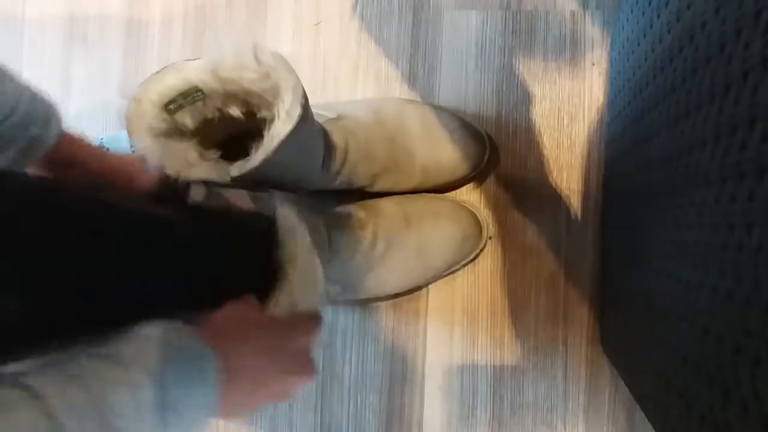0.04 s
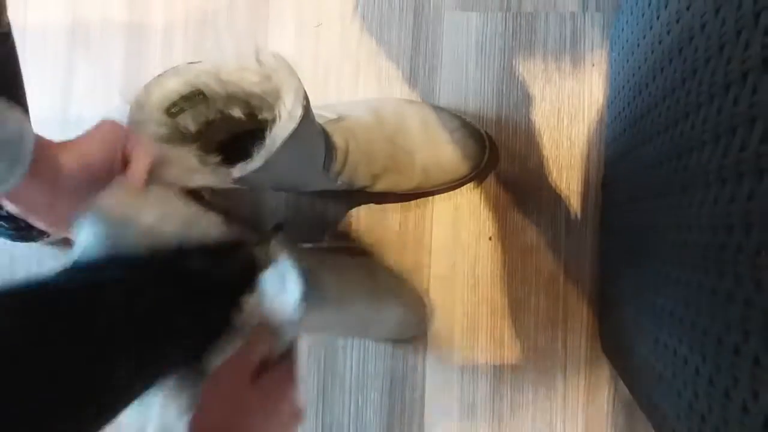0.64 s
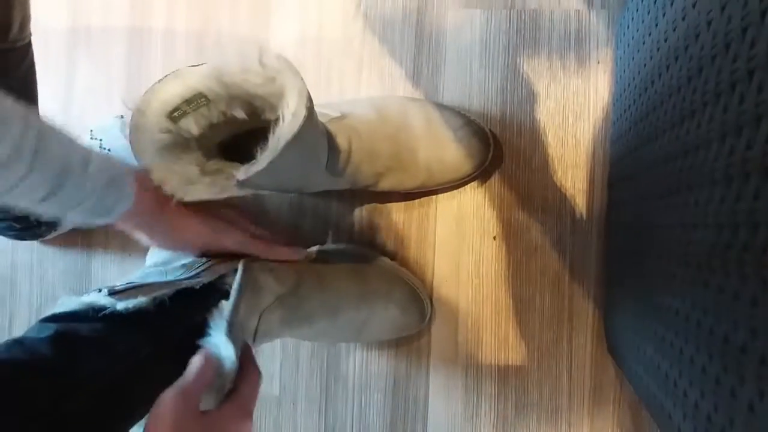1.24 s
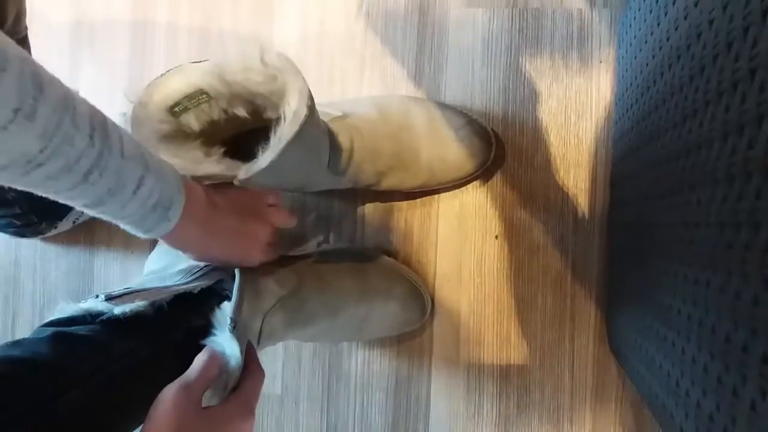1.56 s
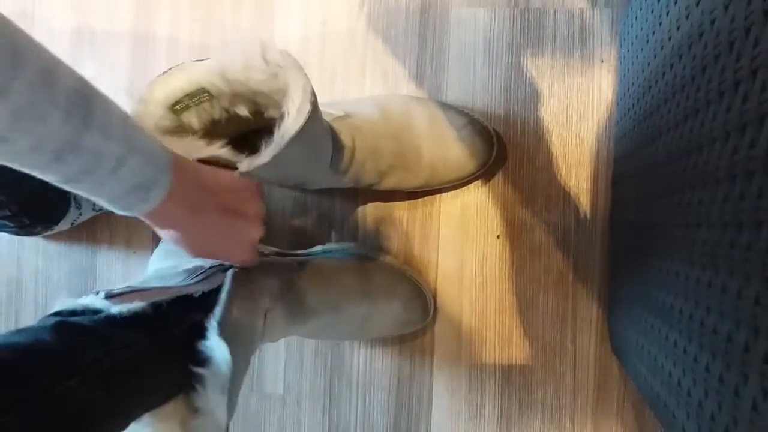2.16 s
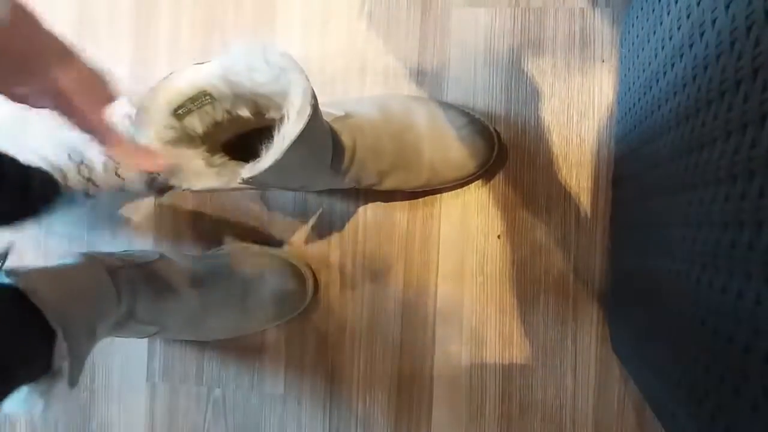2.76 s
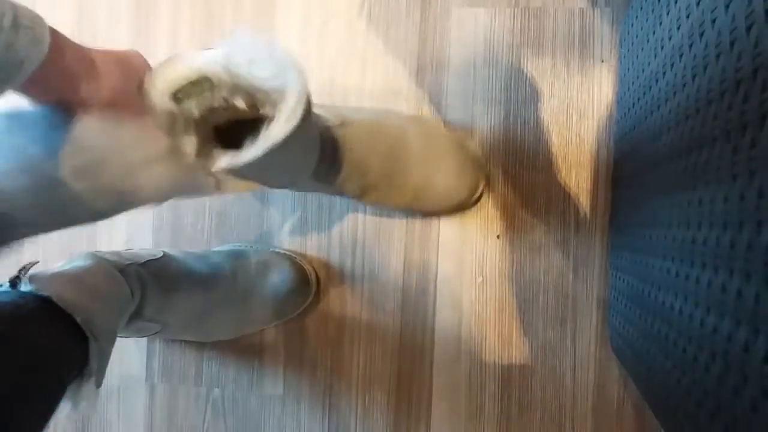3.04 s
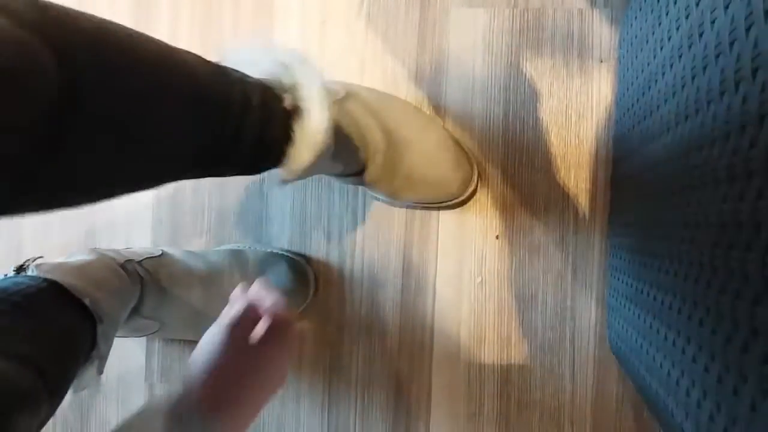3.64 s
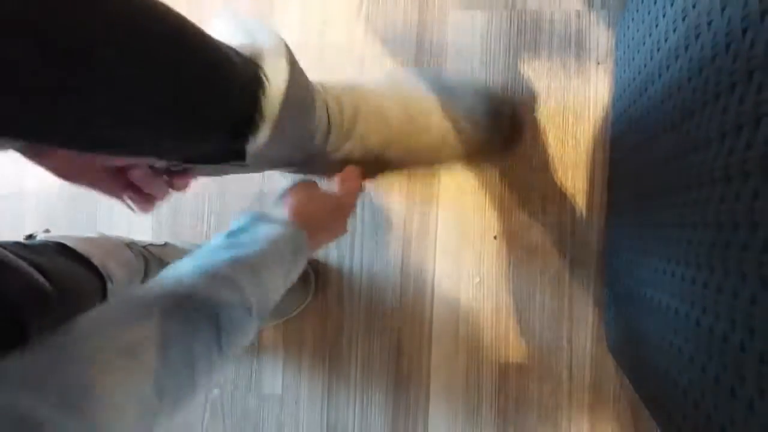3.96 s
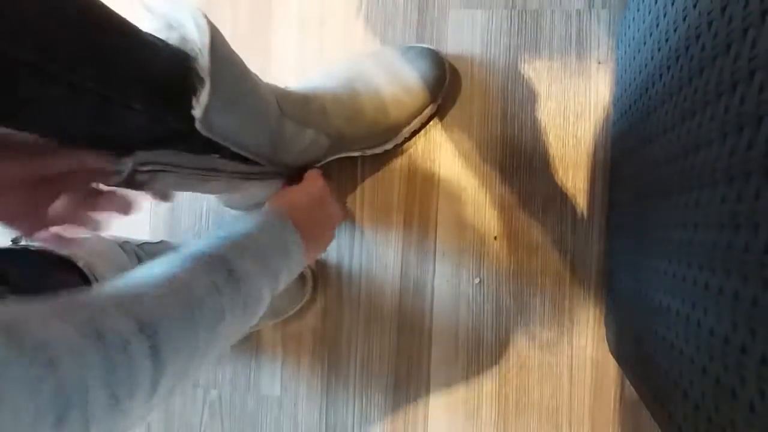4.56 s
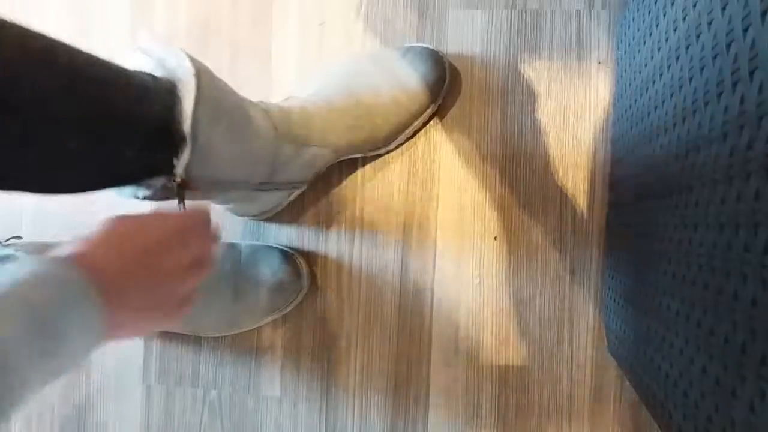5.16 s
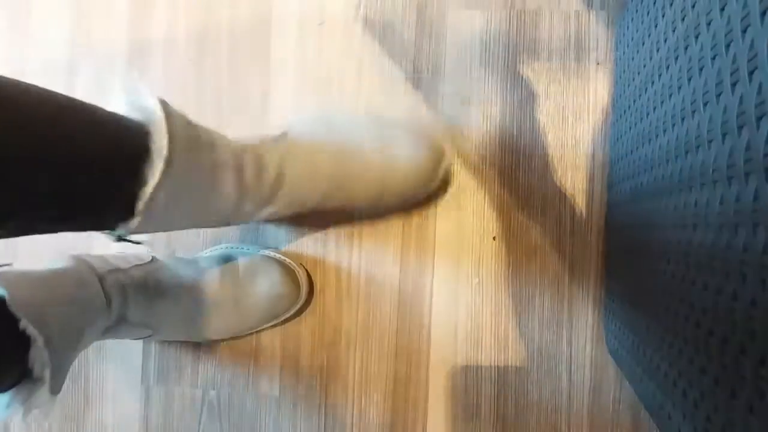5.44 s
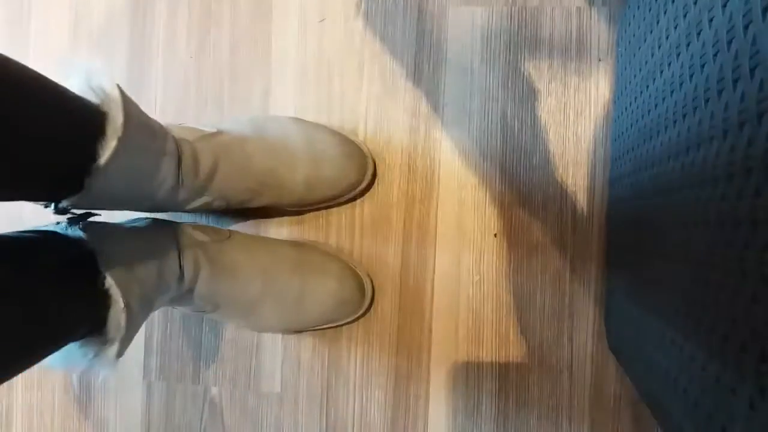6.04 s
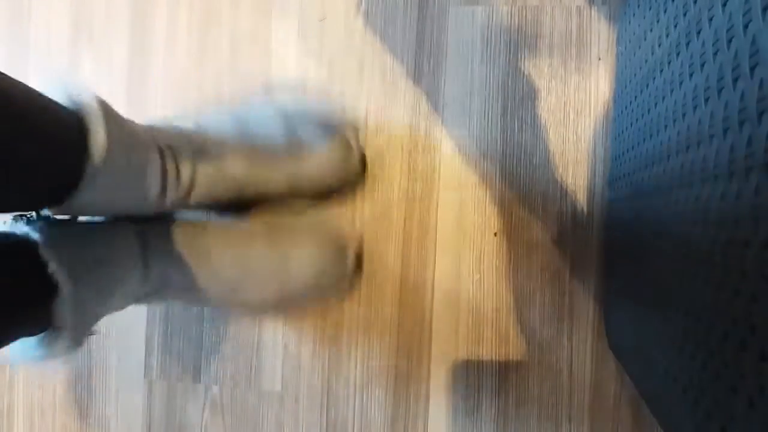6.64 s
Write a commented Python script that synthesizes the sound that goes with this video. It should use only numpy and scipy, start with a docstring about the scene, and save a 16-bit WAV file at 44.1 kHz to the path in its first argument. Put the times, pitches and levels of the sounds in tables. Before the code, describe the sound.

Someone pulls on a pair of fur-lined boots in a small room. Leather and cloth rustle softly, with a few light taps, then the first zip buzzes shut and a sole knocks on the wooden floor. More rustling and knocks lead to a sharp snap and the second zip. Zip pulls tick, and a few scuffing steps with one brief squeak follow, all heard from close by.

```python
"""Zips buzz up two fur-lined boots as they are pulled on over a wooden floor in a small room.
Each slider strikes a train of teeth, and these impulses excite the resonances of the hollow shaft.
Leather and cloth rustle by friction under a soft high hiss, like faint breath.
The leather is tapped lightly, the zip pulls tick, and the boots touch with a crisp tick.
Soles scuff, knock the boards into vibration and squeak once; a slider snaps free before the second zip."""
import sys
import numpy as np
from scipy import signal
from scipy.fft import rfft, irfft
from scipy.io import wavfile

SR = 44100
rng = np.random.default_rng(int(sys.argv[2]) if len(sys.argv) > 2 else 0)


def generate_wav(signal):
    """Clip the signal to [-1, 1] and save it as 16-bit WAV at the path in sys.argv[1]."""
    frames = np.transpose(np.atleast_2d(signal))
    scaled = np.clip(frames, -1, 1) * 32767
    pcm = np.round(scaled).astype(np.int16)
    wavfile.write(sys.argv[1], SR, pcm)


N = 304598

# Noise spectra. Each row: frequency in Hz, relative spectral density in dB.
LEATHER_SPECTRUM = [(60, -13.5), (100, -4.5), (250, 2.5), (520, 1.5), (800, 4), (1400, -2), (1800, -0.5),
                    (2600, -47.5), (5000, -48.5)]
CLOTH_SPECTRUM = [(700, -19.5), (1700, 2.5), (2300, 0.5), (3000, 1), (4300, 0), (5500, -14.5), (8000, -17),
                  (15000, -23.5)]
HISS_SPECTRUM = [(2500, -32.5), (4800, 7), (5800, 2), (7200, 2), (8200, -9), (10500, -25), (15000, -22.5)]
SCUFF_SPECTRUM = [(120, -34), (200, -7.5), (399, -7.5), (630, -4), (827, 1.5), (1190, -5.5), (2380, -16.5),
                  (2600, -8), (2900, -9), (6830, -22.5), (8820, -44), (15500, -46)]
HEEL_SPECTRUM = [(90, -34.5), (220, 1.5), (350, 2.5), (600, -2.5), (900, -17), (2000, -39), (5000, -66)]
SOLE_SPECTRUM = [(300, -22), (700, 8.5), (1050, 2), (1350, -1.5), (1700, -3), (2300, -20.5), (5000, -16.5),
                 (12000, -51)]
PULL_SPECTRUM = [(700, 10), (1200, 10.5), (2500, -2), (5000, 6.5), (6800, 4.5), (8000, -1.5), (10000, 2.5),
                 (12000, -15), (15000, 1.5)]
TAP_SPECTRUM = [(200, -1), (500, -7), (800, 3.5), (1300, 1), (1700, -5), (2400, -26), (6000, -37)]
RASP_SPECTRUM = [(1000, -14.5), (1700, 2), (1930, -8.5), (2200, -5.5), (2550, -12), (3500, -7.5),
                 (4020, -11.5), (4660, -9.5), (5660, -23), (7060, -14.5), (8820, -30.5), (14800, -30),
                 (15500, -35)]
SNAP_SPECTRUM = [(180, -47), (300, -13), (446, -18), (794, -1), (953, -9.5), (1160, 2.5), (1350, -16),
                 (1780, 0), (2140, -17), (2360, -3), (2930, -8.5), (4300, -10.5), (4960, -20), (5950, -25),
                 (7620, -30), (15500, -57)]
HUSH_SPECTRUM = [(15, -43), (25, -9), (44, 4), (113, 1), (469, -14), (648, -16), (1200, -8), (2360, -16),
                 (4500, -22), (6050, -40), (6920, -25), (8350, -34.5), (15500, -27.5)]
# Swells of rustle and soft high hiss. Each row: start in seconds, length in seconds, level in dB,
# lean from leather (-) to hiss (+) in dB.
RUSTLES = [(0.0, 0.18, -54, -1), (0.09, 0.25, -53, -1), (0.31, .11, -52.5, 2.5), (0.46, 0.26, -58, 0.5),
           (0.68, 0.13, -63, -2.5), (0.84, .27, -71, 4), (1.133, 0.12, -61.5, 3), (1.28, 0.3, -62.5, -9),
           (1.6, 0.055, -50, 1), (1.701, 0.11, -60.5, -3.5), (2.32, 0.23, -52, 2), (2.671, 0.16, -52.5, -1),
           (2.828, 0.13, -59, 0.5), (2.985, 0.21, -52, 3.5), (3.14, 0.13, -51, 1.5), (3.27, 0.27, -52.5, 2),
           (3.588, 0.13, -48.5, 0.5), (3.755, .18, -48.5, 0), (3.98, .25, -51, 1.5), (4.24, 0.19, -56, 1),
           (4.5, 0.21, -55.5, -5), (4.82, 0.22, -47.5, -1.5), (5.199, 0.079, -63, -7),
           (5.39, 0.31, -60.5, 1), (5.65, 0.38, -52.5, 1.5), (5.94, 0.15, -52.5, -1), (6.11, 0.17, -61, 1),
           (6.4, 0.068, -63.5, -14.5), (6.561, 0.22, -55.5, -1), (6.75, 0.089, -47.5, -1)]
# Scrapes of soles and shafts. Each row: start in seconds, length in seconds, level in dB,
# moment of greatest force as a fraction of the length.
SCUFFS = [(0.289, 0.17, -44.5, 0.48), (1.597, 0.091, -43.5, 0.16), (3.821, 0.11, -39.5, 0.56),
          (5.948, 0.062, -43.5, 0.13), (6.27, 0.16, -43, 0.32), (6.375, 0.021, -35, 0),
          (6.735, 0.09, -36.5, 0.53)]
# Footfalls. Each row: start in seconds, force in dB, lean from flat (-) to heel first (+) in dB,
# slap level in dB, delay until the sole settles in seconds.
FOOTFALLS = [(0.384, -50, -5.5, -47, 0.054), (1.055, -59.5, 0.5, -64, 0.0084),
             (1.598, -49.5, 0.5, -37, 0.014), (2.671, -47.5, -0.5, -46, 0.013),
             (2.75, -30.5, -4.5, -32, 0.033), (3.144, -50.5, 1, -67, .02), (3.461, -44, -0.5, -56, 0.019),
             (3.677, -38.5, 0.5, -37.5, .015), (3.904, -35.5, 0.5, -38, 0.022),
             (4.145, -40, -3.5, -36, .089), (5.656, -41, 5, -45, 0.061), (6.377, -45, 8, -38.5, .012),
             (6.667, -43, -5, -45.5, .01), (6.806, -36.5, -2, -37, 0.015)]
# Floorboard modes. Each row: frequency in Hz, relative level in dB, 60 dB decay time in seconds.
BOARD_MODES = [(95, -17, 0.087), (123.3, -1.5, 0.13), (175, -10, 0.11), (214, 3, 0.038),
               (266, -10.5, 0.091), (445, -9, .11)]
# Ticks of the zip pulls. Each row: start in seconds, level in dB, ring frequency in Hz.
TICKS = [(0.5075, -61, 7050), (1.6008, -51, 6900), (2.6744, -55.5, 6950), (2.8408, -45, 7130),
         (2.9764, -53.5, 11040), (3.0635, -53, 6330), (4.338, -55, 10500), (5.2425, -60, 6700),
         (5.28, -56, 6450), (5.3753, -49, 6800), (5.9551, -48, 8300), (6.275, -50.5, 9500),
         (6.774, -49.5, 6600)]
# Light taps on leather and, last, a crisp tick of the boots touching.
# Each row: start in seconds, hollow body level in dB, crisp edge level in dB.
TAPS = [(0.514, -50, -68), (0.8, -56.5, -62), (1.051, -58, -61), (1.262, -44, -60), (1.344, -49.5, -68),
        (1.439, -47, -53.5), (1.486, -45, -57), (1.521, -47, -52.5), (1.546, -50, -71), (1.602, -42, -47.5),
        (1.64, -41, -61), (4.113, -49.5, -74), (4.336, -46.5, -67), (5.375, -55, -64), (5.505, -59, -50.5),
        (5.93, -45, -52), (6.381, -39, -42)]
# Slider speed on each zip. Each row: time in seconds, rate in teeth per second.
FIRST_SPEED = [(2.029, 24.8), (2.058, 42.3), (2.092, 78), (2.19, 158), (2.235, 287), (2.28, 297),
               (2.35, 259), (2.42, 352), (2.48, 405), (2.55, 240)]
SECOND_SPEED = [(4.577, 29.87), (4.606, 38.53), (4.627, 58.2), (4.7, 159.4), (4.76, 214), (4.81, 165.7),
                (4.906, 267.5), (4.964, 285.8), (4.986, 356.3), (5.024, 382), (5.07, 374)]
# Pressure of each slider on its teeth. Each row: time in seconds, gain in dB.
FIRST_STRAIN = [(2.028, -4), (2.13, -2.5), (2.25, -5.5), (2.29, 0), (2.38, -.5), (2.475, 0.5), (2.551, -15)]
SECOND_STRAIN = [(4.577, 3), (4.61, 5), (4.665, 7), (4.78, -3), (4.86, 0), (4.95, -4.5), (5.012, 2),
                 (5.044, -16)]
# Modes of each boot shaft. Each row: frequency in Hz, bandwidth in Hz, relative level in dB.
FIRST_SHAFT_MODES = [(284, 88, -4.5), (593, 150, 2), (874, 91, 5.5), (1190, 340, 0), (1490, 45, -5)]
SECOND_SHAFT_MODES = [(272, 31, -4), (749, 57, 7), (852, 58, 9), (1160, 135, 0), (1310, 72, 1)]
# The slider snapping free. Each row: start in seconds, level in dB, 60 dB decay time in seconds.
SNAPS = [(4.439, -33, 0.027), (4.442, -28.5, 0.021), (4.46, -54, 0.02)]
# Reverberation of the room. Each row: frequency in Hz, 60 dB decay time in seconds.
ROOM_DECAY = [(80, 0.17), (250, 0.71), (800, 0.38), (2000, 0.49), (5000, 0.35), (14000, 0.26)]


def amp(db):
    """Amplitude grows tenfold for every 20 dB."""
    return 10 ** (np.asarray(db) / 20)


def unit_rms(x):
    """Normalisation to unit mean power."""
    return x / np.sqrt(np.mean(x ** 2) + 1e-20)


def decay(t, t60):
    """Exponential damping: a fall of 60 dB in t60 seconds."""
    return np.exp(-np.log(1000) * t / t60)


def at_frequency(table, hz):
    """Interpolation on a logarithmic frequency axis."""
    table_hz, values = np.transpose(table)
    return np.interp(np.log(hz + 1), np.log(table_hz + 1), values)


def add(mix, start, sound):
    """Superposition: a sound joins the mix at its start in seconds."""
    part = mix[max(round(start * SR), 0):][:len(sound)]
    part += sound[:len(part)]


def colour(x, spectrum, size=4096):
    """A minimum-phase filter of unit energy imposes the spectrum."""
    log_gain = np.log(amp(at_frequency(spectrum, abs(np.fft.fftfreq(size, 1 / SR)))))
    taps = np.fft.ifft(np.exp(np.conj(signal.hilbert(log_gain)))).real[:size // 2]
    return signal.fftconvolve(x, taps / np.linalg.norm(taps))[:len(x)]


def bandpass(x, order, edges_hz):
    """A band-pass filter attenuates what lies outside its edges."""
    return signal.sosfilt(signal.butter(order, edges_hz, "band", fs=SR, output="sos"), x)


def wander(count, hz):
    """Low-passed noise gives a random drift of unit rms."""
    rolloff = 1 + (np.fft.rfftfreq(count, 1 / SR) / hz) ** 4
    return unit_rms(irfft(rfft(rng.standard_normal(count)) / rolloff, count))


def grainy_noise(count, per_s, spread_db, smooth):
    """Shot noise: random clicks of uneven size over a smooth hiss."""
    sizes = amp(spread_db * np.minimum(rng.exponential(1, count), 4))
    clicks = sizes * rng.standard_normal(count) * (rng.random(count) < per_s / SR)
    return unit_rms(unit_rms(clicks) + smooth * rng.standard_normal(count))


def struck(x, db):
    """The level of a transient is set by the rms of its first 20 ms."""
    return amp(db) * x / np.sqrt(np.mean(x[:SR // 50] ** 2) + 1e-20)


def impact(spectrum, t60, db, count=12000):
    """Broadband excitation: a brief contact gives damped noise in the colour of what is hit."""
    noise = rng.standard_normal(count) * decay(np.arange(count) / SR, t60)
    return struck(colour(noise, spectrum), db)


def rustle(rise_s=0.015, ease_db_per_s=10, release_s=0.04, stir_db=-74):
    """Sliding friction of leather and cloth, under a soft high hiss like faint breath."""
    t = np.arange(N) / SR
    powers = np.full((3, N), amp(stir_db) ** 2)  # a faint stir between swells
    for start, length, db, lean_db in RUSTLES:
        age = t[:int((length + 10 * release_s) * SR)]
        rise = np.minimum(age / rise_s, 1)
        release = np.exp(-np.maximum(age - length, 0) / release_s)
        swell = rise * amp(db - ease_db_per_s * age) * release
        for power, share in zip(powers, amp([-lean_db, 0, lean_db])):
            add(power, start, (share * swell) ** 2)
    leather_gain, cloth_gain, hiss_gain = np.sqrt(powers)
    creak = amp(2) * leather_gain * colour(grainy_noise(N, 900, 2.5, 1.03), LEATHER_SPECTRUM)
    swish = cloth_gain * colour(grainy_noise(N, 2000, 1.5, 1.36), CLOTH_SPECTRUM)
    hiss = amp(-4) * hiss_gain * colour(grainy_noise(N, 1700, 1.7, 1.5), HISS_SPECTRUM)
    return creak + swish + hiss


def scuffs():
    """Gritty friction noise swells and fades with the contact force."""
    out = np.zeros(N)
    for start, length, db, crest in SCUFFS:
        count = int(length * SR)
        force = np.interp(np.arange(count) / count, [0, np.clip(crest, .02, .98), 1], [.3, 1, 0])
        grit = grainy_noise(SR, per_s=2500, spread_db=3.8, smooth=0.81)[:count]
        add(out, start, amp(db) * force * colour(grit, SCUFF_SPECTRUM))
    return out


def sole_contact(thud_db, knock_db, slap_db, push_s=0.0032, lag_s=0.0033):
    """Modal excitation: a sole hits and its half-sine push rings the boards, differently at each spot."""
    t = np.arange(SR // 2) / SR
    push = np.sin(np.pi * np.minimum(t / push_s, 1))
    boards, sound = np.zeros((2, len(t)))
    for hz, db, t60 in BOARD_MODES:
        envelope = amp(db + 2 * rng.standard_normal()) * decay(t, t60)
        boards += envelope * np.sin(2 * np.pi * hz * rng.uniform(0.97, 1.05) * t)
    add(sound, lag_s, struck(signal.fftconvolve(boards, push), thud_db))
    add(sound, 0, impact(HEEL_SPECTRUM, 0.08, knock_db) + impact(SOLE_SPECTRUM, 0.032, slap_db))
    return sound


def footfalls():
    """Double impact: the edge strikes, then the sole settles with a duller sound."""
    out = np.zeros(N)
    for start, force_db, heel_db, slap_db, settle_s in FOOTFALLS:
        knock_db = force_db + heel_db  # heel first knocks more and thuds less
        add(out, start, sole_contact(force_db - heel_db, knock_db, slap_db))
        add(out, start + settle_s, sole_contact(force_db - 0.5, knock_db - 3.5, slap_db - 12))
    return out


def pull_ticks():
    """Free vibration: a struck zip pull clicks and rings briefly at one frequency."""
    out, t = np.zeros(N), np.arange(SR // 5) / SR
    for start, db, hz in TICKS:
        ring = np.sin(2 * np.pi * hz * t) * decay(t, t60=0.045)
        add(out, start, impact(PULL_SPECTRUM, 0.035, db))
        add(out, start, struck(ring, db - 11))
    return out


def taps(t60=0.078):
    """Damped impacts: light taps on leather, and a crisp tick of the boots touching."""
    out = np.zeros(N)
    for start, body_db, crisp_db in TAPS:
        add(out, start, impact(TAP_SPECTRUM, t60, body_db) + impact(RASP_SPECTRUM, t60, crisp_db))
    return out


def shaft_resonance(drive, modes):
    """Forced vibration: the hollow leather shaft responds as a sum of damped modes."""
    t = np.arange(SR // 10) / SR
    response = np.zeros(len(t))
    for k, (hz, width, db) in enumerate(modes):
        envelope = amp(db) * width * np.exp(-np.pi * width * t)
        response += envelope * np.cos(2 * np.pi * hz * t + k * np.pi / 2)
    return bandpass(signal.fftconvolve(drive, response)[:len(drive)], 3, [230, 1900])


def zipper(speed, strain, modes, jitter, rasp_db, flap_db, flap_hz, leather_db, shaft_db=-27.5):
    """Impulse-train excitation: the teeth rasp and shake the shaft, louder with speed and strain."""
    drag_s, fade_s, flap_octaves = 0.0022, 0.047, 0.83
    t = np.arange(speed[0][0], speed[-1][0], 1 / SR)
    count = len(t)
    rate = np.interp(t, *np.transpose(speed))
    strain_db = np.interp(t, *np.transpose(strain))
    travel = np.cumsum(rate * (1 + jitter * wander(count, 120))) / SR  # in teeth
    tooth_size = amp(1.5 * wander(count, 260))
    clicks = unit_rms(np.diff(np.floor(travel), prepend=-1) * np.sqrt(SR / rate) * tooth_size)
    # each tooth drags briefly through the slider
    tooth_age = (travel % 1) / rate
    drag_envelope = np.exp(-tooth_age / drag_s) * np.sqrt(rate) * tooth_size
    drag = unit_rms(drag_envelope * rng.standard_normal(count))
    drive = unit_rms(clicks + 0.33 * drag)
    hollow = unit_rms(shaft_resonance(drive, modes))
    # the open flap hums as the tooth rate passes its own pitch
    flap = unit_rms(bandpass(drive, 2, flap_hz * 2 ** (flap_octaves * np.array([-.5, .5]))))
    rasp = unit_rms(colour(clicks + 0.91 * drag, RASP_SPECTRUM))
    # the leather rubs as the slider gets going and draws it together
    rub = np.minimum(rate / 130, 1) * colour(grainy_noise(N, 900, 2.6, 0.73)[:count], LEATHER_SPECTRUM)
    speed_decades = np.log10(rate / 300)  # from an easy pace of 300 teeth per second
    sound = amp(shaft_db + strain_db + 18 * speed_decades) * hollow
    sound += amp(rasp_db + strain_db + 11 * speed_decades) * rasp
    sound += amp(leather_db + strain_db) * rub + amp(flap_db) * flap
    out = np.zeros(N)
    add(out, t[0], sound * np.clip((t[-1] - t) / fade_s, 0, 1))
    return out


def slider_snap():
    """Sudden release: the slider snaps free in a cluster of sharp transients."""
    out = np.zeros(N)
    for start, db, t60 in SNAPS:
        add(out, start, impact(SNAP_SPECTRUM, t60, db))
    return out


def squeak(start=6.29, length_s=0.096, hz=2590, db=-47, waver=0.044):
    """Stick-slip oscillation: rubber on the boards gives a thin, unsteady note that swells."""
    out, count = np.zeros(N), int(length_s * SR)
    cycles = np.cumsum(hz * (1 + waver * wander(count, 400))) / SR
    swell = np.sin(np.pi * np.linspace(0, 1, count) ** 2)
    add(out, start, amp(db) * swell * np.sin(2 * np.pi * cycles))
    return out


def room(x, wet_db, gap_s=0.0049, echoes_per_s=3000):
    """Reverberation: sparse reflections follow the direct sound, each band dying at its own rate."""
    echoes = rng.choice([-1., 1.], SR) * (rng.random(SR) < echoes_per_s / SR)
    echoes *= np.arange(SR) > gap_s * SR
    hz, t, bands = signal.stft(echoes, SR, nperseg=256)
    tail = signal.istft(bands * decay(t, at_frequency(ROOM_DECAY, hz)[:, None]), SR)[1]
    return x + amp(wet_db) * signal.fftconvolve(x, tail / np.linalg.norm(tail))[:N]


def scene():
    """Superposition of all sources and their reflections over the quiet hush of the room."""
    zips = zipper(FIRST_SPEED, FIRST_STRAIN, FIRST_SHAFT_MODES, jitter=0.045,
                  rasp_db=-45, flap_db=-56.5, flap_hz=122, leather_db=-47)
    zips += zipper(SECOND_SPEED, SECOND_STRAIN, SECOND_SHAFT_MODES, jitter=0.025,
                   rasp_db=-44, flap_db=-50, flap_hz=201, leather_db=-42)
    mix = amp(-60) * colour(rng.standard_normal(N), HUSH_SPECTRUM)
    mix += room(rustle(), wet_db=-10.5)
    mix += room(scuffs() + squeak(), wet_db=-3.5)
    mix += room(footfalls(), wet_db=-3.5)
    mix += room(pull_ticks() + taps() + slider_snap(), wet_db=-1.5)
    mix += room(zips, wet_db=-0.5)
    return mix[None]


def record(dry, bass_hz=63, edge_hz=15600):
    """Band limiting: a small microphone loses the deep bass, and a low-pass cuts the highest treble."""
    thin = signal.sosfilt(signal.butter(6, bass_hz, "high", fs=SR, output="sos"), dry)
    lowpass = signal.firwin(511, edge_hz, window=("kaiser", 9), fs=SR)
    return signal.oaconvolve(thin, lowpass[None], "same")


dry = scene()
out = record(dry)
generate_wav(out)
```